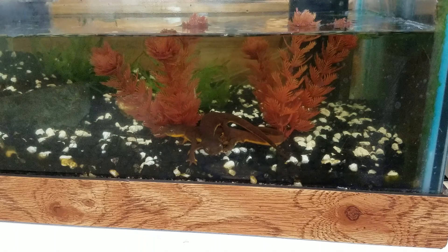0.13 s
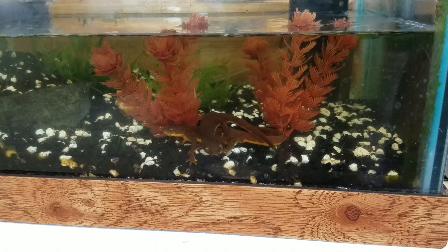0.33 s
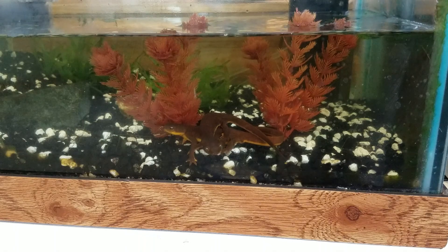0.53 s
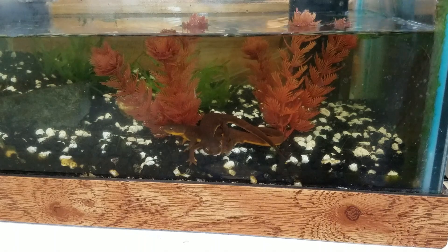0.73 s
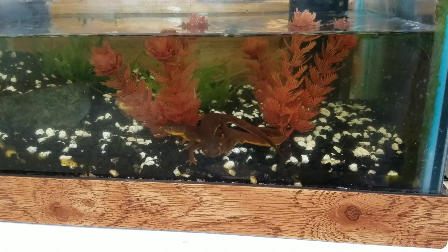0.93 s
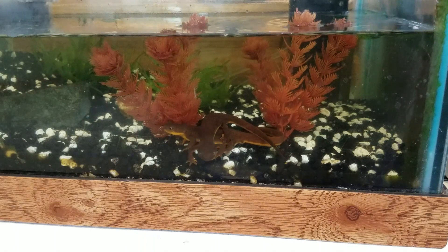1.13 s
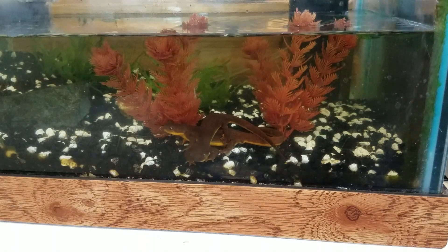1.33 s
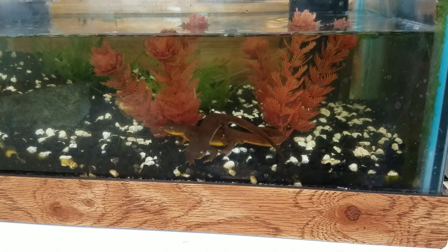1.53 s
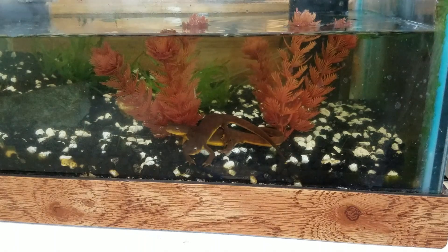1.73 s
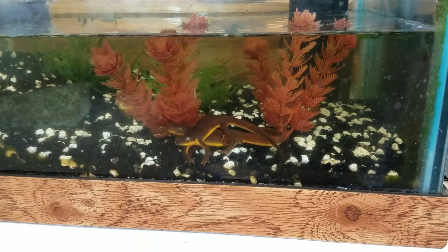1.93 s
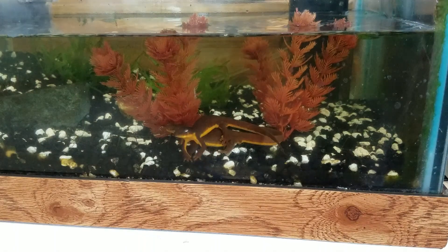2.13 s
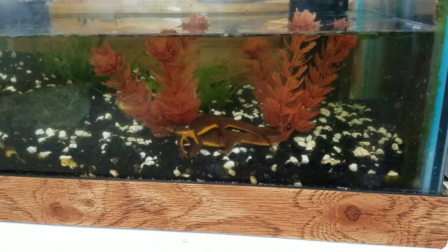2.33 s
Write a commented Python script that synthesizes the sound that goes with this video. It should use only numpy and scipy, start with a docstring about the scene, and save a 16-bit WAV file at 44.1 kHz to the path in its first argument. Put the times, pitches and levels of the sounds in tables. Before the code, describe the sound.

The low, steady hum of a running fish tank motor rises out of silence and carries on indoors. An even rush of water and air spreads around it in stereo, along with faint, thin whines.

```python
"""A steady rush and a low hum fade in from silence; the deep bass opens a moment after the rest.
This is aquarium equipment running in a small room. Moving water and air make the even rush.
The motor and its housing add faint, thin whines. The motor hums as mains power shakes it,
and its turning shaft adds a lower tone."""
import sys
import numpy as np
from scipy import signal
from scipy.fft import rfft, irfft
from scipy.io import wavfile
from scipy.ndimage import uniform_filter1d

SR = 44100
rng = np.random.default_rng(int(sys.argv[2]) if len(sys.argv) > 2 else 0)


def transcribe(u):
    """Save the signal u as a 16-bit wav file named by the first command-line argument.

    u: samples, shape (n,) or (channels, n), limited to [-1, 1]; the rate is SR.
    q: integer samples, one column per channel.
    """
    v = np.clip(np.atleast_2d(u).T, -1, 1)
    q = np.round(v * 32767).astype(np.int16)
    wavfile.write(sys.argv[1], SR, q)


N = 109323


def gain(db):
    """Turn decibels into a number to multiply by."""
    return 10 ** (np.asarray(db) / 20)


def wander(steps_per_s):
    """A smooth random curve that strays about 1 either side of zero."""
    hold = int(SR / steps_per_s)
    steps = rng.standard_normal(256)[np.arange(N) // hold % 256]
    return 1.3 * uniform_filter1d(uniform_filter1d(steps, hold), hold)


def noise(shape, level_db):
    """Noise shaped by (pitch_hz, relative_db) points, then set to an average level."""
    pitch_hz, relative_db = np.array(shape).T
    hz = np.maximum(np.fft.rfftfreq(N, 1 / SR), 1)
    curve_db = np.interp(np.log(hz), np.log(pitch_hz), relative_db)
    shaped = irfft(rfft(rng.standard_normal(N)) * gain(curve_db), N)
    return shaped * gain(level_db) / shaped.std()


def tone(pitch_hz, level_db, waver_db, lead_rad=0):
    """A pure tone whose loudness wavers; lead_rad shifts the wave earlier."""
    phase = 2 * np.pi * (np.cumsum(pitch_hz * np.ones(N)) / SR + rng.random())
    return np.sqrt(2) * gain(level_db + waver_db * wander(5.03)) * np.sin(phase + lead_rad)


# The rush that both sides share: pitch_hz, relative_db
RUSH_SHARED = [(20, -34), (40, -17.5), (60, -12.5), (90, -6.5), (135, -1), (158, -6.5), (180, -1),
               (250, -2), (300, -8), (360, -7.5), (480, -11), (600, -14.5), (800, -15.5), (1100, -23.5),
               (1600, -27.5), (2050, -26.5), (2800, -33), (3800, -38), (4400, -37), (5200, -41.5),
               (7000, -45.5), (8000, -43.5), (8600, -47), (9400, -50), (13500, -45), (15700, -45.5)]
# The rush that differs between left and right: pitch_hz, relative_db
RUSH_WIDE = [(20, -31), (60, -17), (120, -3), (200, -3), (330, -1.5), (460, -3), (600, -7), (800, -4.5),
             (1250, -8.5), (1550, -10), (2050, -14), (2800, -21), (3800, -22.5), (4400, -26.5),
             (5200, -28.5), (7000, -31), (8000, -33), (8600, -31), (9400, -36.5), (13500, -31.5),
             (15700, -34)]


def rush():
    """Moving water and air make an even noise, centred in the bass and wide higher up."""
    flow = noise(RUSH_SHARED, level_db=-33) + noise(RUSH_WIDE, level_db=-41) * np.array([[1], [-1]])
    hz = np.maximum(np.fft.rfftfreq(N, 1 / SR), 1)
    octave = np.clip(np.log2(hz / 62.5), 0, 8)
    spectrum, out = rfft(flow), 0
    swell_db = 0.13 * wander(9)
    for k in range(9):  # the octaves swell together, and each flickers a little on its own
        band = irfft(spectrum * np.maximum(1 - abs(octave - k), 0), N)
        flicker_db = 0.52 * wander(13.93)
        out = out + band * gain(swell_db + flicker_db)
    return out


def room(sound, ripple_db=1.3, step_hz=22.07, full_from_hz=3300):
    """Reflections leave fine, unmoving peaks and dips in the treble, different at each microphone."""
    hz = np.fft.rfftfreq(N, 1 / SR)
    bumps = rng.standard_normal((2, 2048))
    ripple = np.array([np.interp(hz / step_hz, np.arange(2048), side) for side in bumps])
    depth_db = ripple_db * np.minimum(hz / full_from_hz, 1)
    return irfft(rfft(sound) * gain(depth_db * ripple), N)


# Whines of the motor and its housing: pitch_hz, level_db, left_minus_right_db
MOTOR_WHINES = [(265.6, -52, -4.5), (338.4, -49.5, 4), (372.6, -50.5, 2), (447.7, -53, 2),
                (464.7, -54.5, 3), (564, -58.5, -3), (665, -66.5, 13), (770.4, -54, 9), (825, -59.5, 0),
                (987, -59, 0), (1173, -66, 9), (1283, -70.5, 0), (1345, -66, 11), (1372, -64.5, 8),
                (1478, -64, -7), (1596, -65.5, -11.5), (1707, -61, -5), (1743, -63.5, -3), (1740, -66, -9),
                (1822, -68, 4), (2023, -68, 1), (2530, -67.5, -1), (3080, -76, -5), (4150, -76, 0),
                (4172, -79, 1), (4260, -77, 5), (4385, -72, 3), (4490, -77, -6), (5510, -74, 2),
                (6760, -76, 3), (13787, -79, 4)]


def whines(drift_hz=1.513, mic_spacing_m=.1):
    """Thin tones bounce round the room; higher ones reach the two microphones more out of step."""
    out, sides = 0, np.array([[.5], [-.5]])
    for pitch_hz, level_db, pan_db in MOTOR_WHINES:
        gap_rad = min(2 * np.pi * pitch_hz * mic_spacing_m / 343, np.pi / 2)  # a quarter wave at most
        lead_rad = gap_rad * rng.choice([-1, 1]) * sides
        drifting_hz = pitch_hz + drift_hz * wander(6.04)
        out = out + tone(drifting_hz, level_db + pan_db * sides, waver_db=2, lead_rad=lead_rad)
    return out


# The tones of the mains hum: multiple_of_hum_pitch, level_db
HUM_TONES = [(1, -34), (2, -56.5), (3, -51)]


def motor_hum(hum_hz=119.94, shaft_hz=58.2):
    """The motor shakes at twice the rate of the mains power, and once for each turn of its shaft."""
    mains = sum(tone(multiple * hum_hz, level_db, waver_db=.3) for multiple, level_db in HUM_TONES)
    shaft = tone(shaft_hz, level_db=-50, waver_db=1.5)
    return mains + shaft


def scene():
    """The hum and whines sound over the rush, which the room colours."""
    return motor_hum() + whines() + room(rush())


# How much louder the left microphone is: pitch_hz, left_minus_right_db
LEFT_BRIGHTNESS = [(200, 0), (1000, 0), (2800, 1), (5500, 1.5), (9000, 1.5), (13500, 2)]
# The rise in loudness out of silence: time_s, gain_db
FADE_UP = [(.138, -25), (.145, -23.5), (.19, -13.5), (.25, -10.5), (.43, -3), (.58, -1), (.85, 0.5)]


def record(dry, bass_hz=129, bass_start_s=0.39, bass_rise_s=0.062, top_hz=15720):
    """The left microphone is brighter; the sound fades in, its bass opens and the very top is cut."""
    time_s, hz = np.arange(N) / SR, np.fft.rfftfreq(N, 1 / SR)
    lean_db = np.interp(hz, *np.array(LEFT_BRIGHTNESS).T)
    full = irfft(rfft(dry) * gain(np.array([lean_db, -lean_db]) / 2), N)
    thin = signal.sosfilt(signal.butter(2, bass_hz, "high", fs=SR, output="sos"), full)
    bass_open = np.clip((time_s - bass_start_s) / bass_rise_s, 0, 1)
    fade_db = np.interp(time_s, *np.array(FADE_UP).T, left=-np.inf)
    faded = (thin + bass_open * (full - thin)) * gain(fade_db)
    return signal.sosfilt(signal.ellip(12, .1, 80, top_hz, fs=SR, output="sos"), faded)


dry = scene()
out = record(dry)
transcribe(out)
```